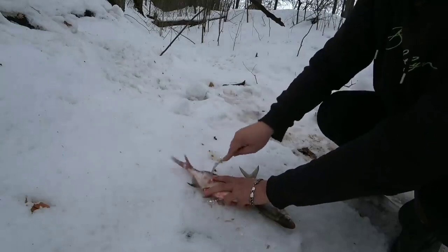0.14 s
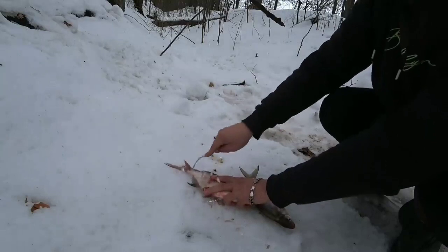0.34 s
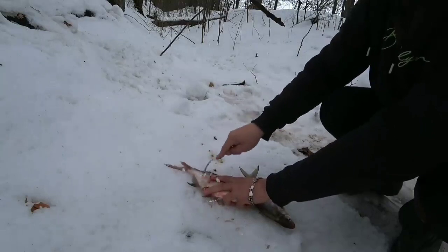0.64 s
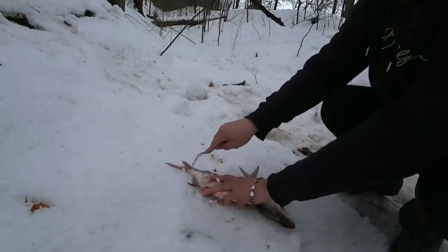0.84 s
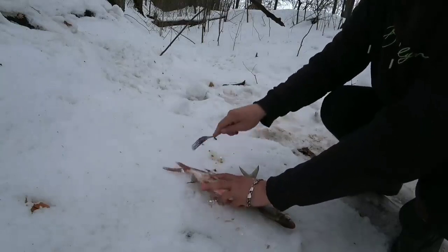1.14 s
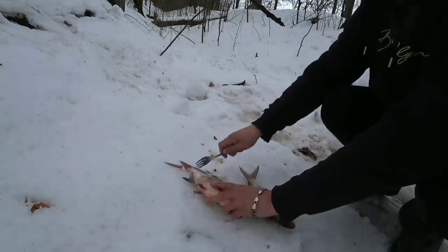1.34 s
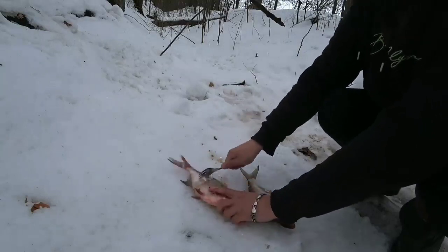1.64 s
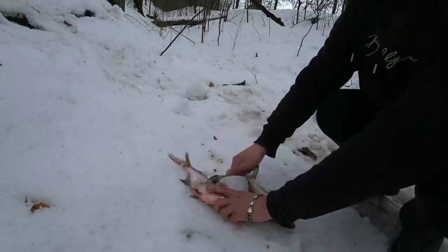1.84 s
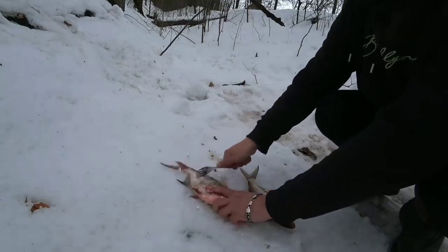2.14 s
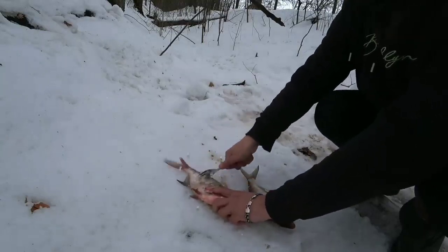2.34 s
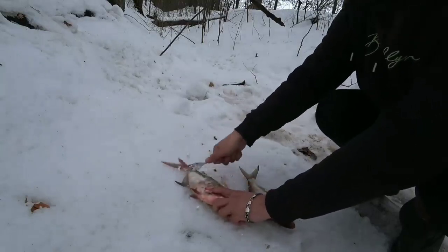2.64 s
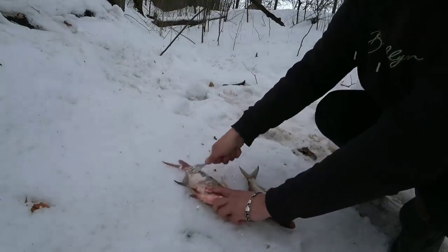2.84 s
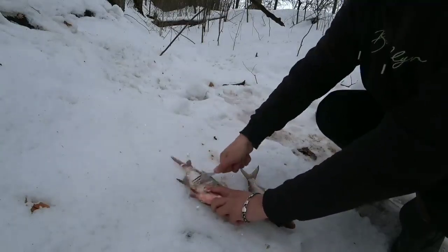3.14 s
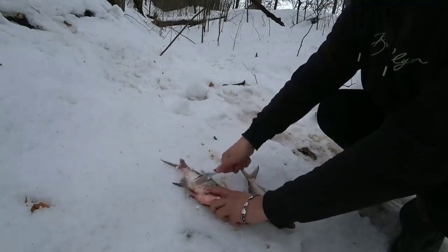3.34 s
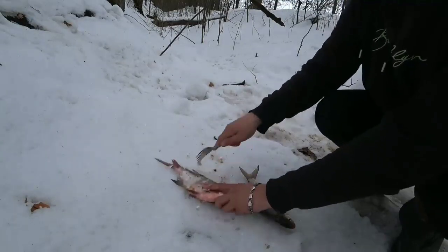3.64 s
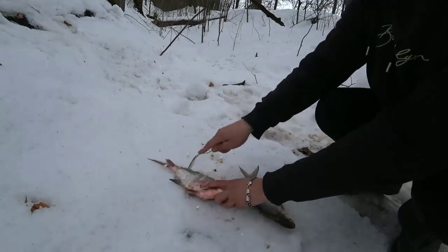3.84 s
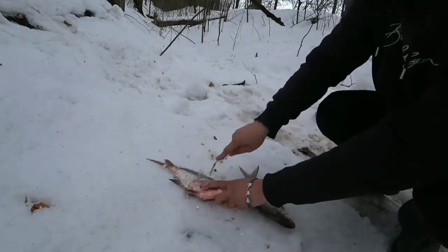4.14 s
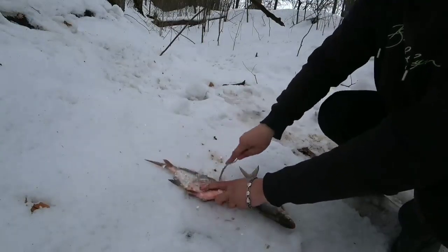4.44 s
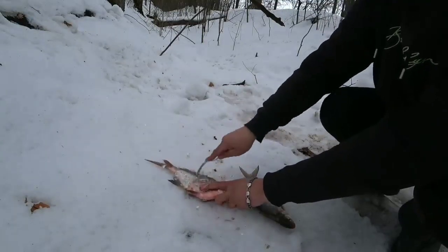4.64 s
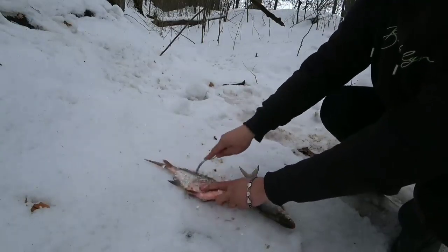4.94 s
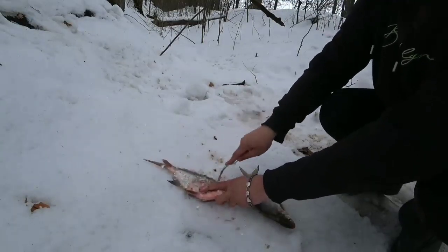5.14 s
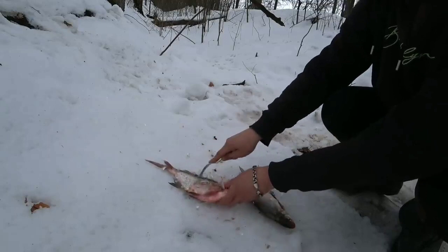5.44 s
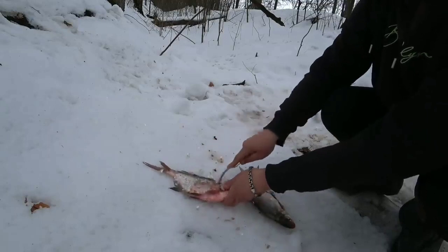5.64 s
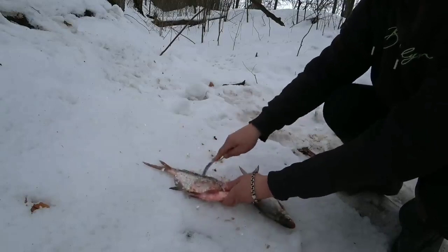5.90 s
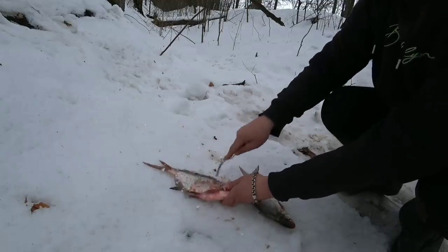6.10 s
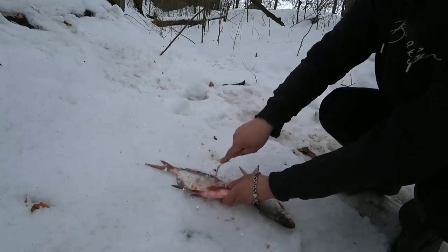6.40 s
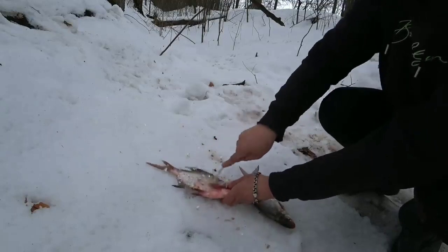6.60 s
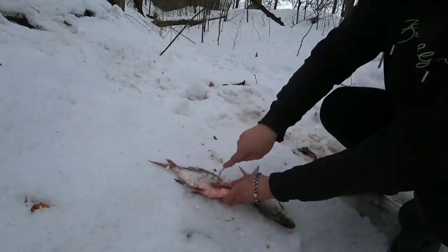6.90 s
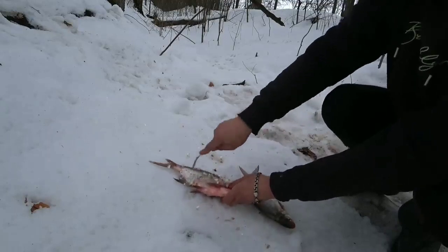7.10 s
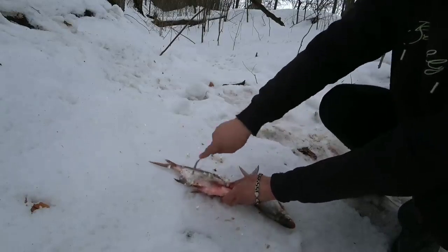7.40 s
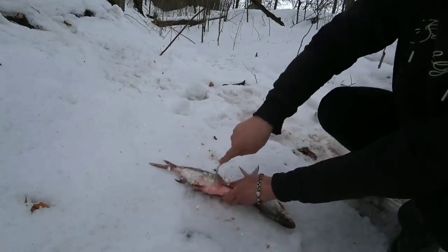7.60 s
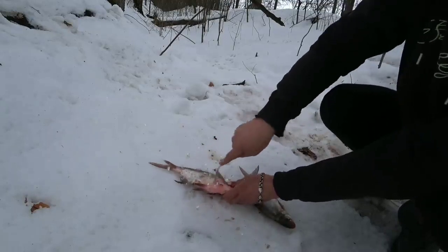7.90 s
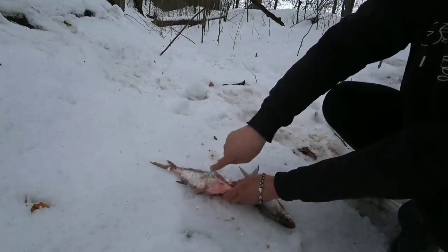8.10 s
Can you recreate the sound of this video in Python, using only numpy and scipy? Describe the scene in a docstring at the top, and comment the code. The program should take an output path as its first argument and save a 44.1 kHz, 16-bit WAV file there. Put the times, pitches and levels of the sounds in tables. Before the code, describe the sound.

Dry scratchy scraping of fork tines over fish scales, outdoors and close. Irregular hard and light passes, each a burst of tiny gritty snaps with a muffled fleshy knock under it. Individual scales crack loudly, especially near two seconds. The middle strokes are duller and more spaced, the final ones brisk and crisp. The fish sits slightly right of centre; very quiet, wide outdoor air surrounds it.

```python
"""The listener first hears a fork scraping scales off a small fish on snow, about five hard or light passes
a second. Stick-slip of the tines is a random train of tiny damped snaps, with a duller knock of the body under it.
Single scales pop off as tight clusters of snaps and set the fork's modes ringing; the body thumps on the
snow as damped modes. Underneath lies a faint, wide wash of open air: noise shaped in frequency and time."""
import sys
import numpy as np
from scipy import signal
from scipy.io import wavfile
from scipy.ndimage import uniform_filter1d

SR = 44100
rng = np.random.default_rng(int(sys.argv[2]) if len(sys.argv) > 2 else 0)


def materialize(psi):
    """Save the field psi as 16-bit PCM at rate SR to the path in sys.argv[1].

    A 1-D psi becomes a single channel; in a 2-D psi each row is a channel.
    """
    bounded = np.clip(np.atleast_2d(psi).T, -1, 1)
    quanta = np.round(bounded * 32767).astype(np.int16)
    wavfile.write(sys.argv[1], SR, quanta)


N = 364266  # length [samples]


def gain_of(db):
    """Level law: decibels to an amplitude factor."""
    return 10 ** (np.asarray(db) / 20)


def evened(x):
    """Power normalisation: scales to rms 1."""
    return x / np.sqrt(np.mean(x ** 2) + 1e-20)


def read(points, hz):
    """Spectral envelope: interpolates the points on a log-frequency axis."""
    f, value = np.transpose(points)
    return np.interp(np.log(hz + 1), np.log(f + 1), value)


def add(mix, s, sound):
    """Superposition: mixes a two-row sound in at s seconds."""
    part = mix[:, round(s * SR):][:, :sound.shape[1]]
    part += sound[:, :part.shape[1]]


def coloured(x, points):
    """Minimum-phase filtering: the Hilbert transform of the log gain gives the phase of a causal filter."""
    hz = abs(np.fft.fftfreq(2048, 1 / SR))
    log_gain = np.log(gain_of(np.maximum(read(points, hz), -100)))
    response = np.exp(np.conj(signal.hilbert(log_gain)))
    taps = np.fft.ifft(response).real[:1024]
    return signal.oaconvolve(x, taps[None], axes=1)[:, :x.shape[1]]


def snap(hz, cycles, grit, size=256):
    """Damped oscillation: a short gritty wiggle, once for the middle and once, unrelated, for the side."""
    turns = np.arange(size) / SR * hz
    detune, phase = rng.uniform(0.85, 1.076, (2, 1)), rng.random((2, 1))
    wiggle = np.sin(2 * np.pi * (turns * detune + phase))
    sound = (wiggle + grit * rng.standard_normal((2, size))) * np.exp(-turns / cycles)
    return sound / np.linalg.norm(sound, axis=1, keepdims=True)


# spectra of the scale crackle and of the knock of the flesh: (frequency [Hz], relative density [dB per Hz])
CRACKLE_SPECTRUM = [(800, -18.5), (1500, -15), (2800, -13), (4500, -11), (6500, -2), (8200, 1), (9300, -2),
                    (11000, -0.5)]
KNOCK_SPECTRUM = [(35, -42), (60, -18), (196, -4), (268, 0), (340, -3.5), (489, 0), (702, -1.5), (890, 0.5),
                  (994, -3), (1110, -3), (1590, -3.5), (2600, -12.5), (3380, -59), (5720, -120)]


def drag():
    """Stick-slip friction: scale edges crackle over a fine rasp, and the same slips knock the flesh."""
    bright_gain, dull_gain, knock_gain = pressure()
    per_s = np.clip(2600 * np.sqrt(bright_gain / gain_of(-45)), 350, 2600)  # a light touch catches few scales
    train = slips(per_s, spread_db=2.0, clump_db=1.5)

    edges = evened(grains(train, 1894, 13570, cycles=1.8, grit=0.6))
    rasp = gain_of(-9.5) * rng.standard_normal((2, N))
    crackle = coloured(edges + rasp, CRACKLE_SPECTRUM)
    dull = signal.sosfilt(signal.butter(4, 4500, fs=SR, output="sos"), crackle)
    bright = signal.sosfilt(signal.butter(4, 4500, "high", fs=SR, output="sos"), crackle)
    crackle = bright_gain * evened(bright) + dull_gain * evened(dull)

    heavy = train * (rng.random(N) < 0.45)  # under half of the slips reach the flesh
    flesh = evened(grains(heavy, 322, 3110, cycles=1.55, grit=0.11))
    flesh = flesh + gain_of(-2.0) * rng.standard_normal((2, N))
    knock = knock_gain * evened(coloured(flesh, KNOCK_SPECTRUM))
    return crackle * gain_of([[0], [-10.5]]) + knock * gain_of([[0], [-8]])  # rows: middle, side


# passes of the tines, hard and light: (deepest time [s], bite before it [ms], drag after it [ms],
# bright crackle at the deepest, before raggedness [dB], body knock above the crackle, before the dig [dB])
PASSES = [(0.114, 20, 18, -61, -1), (0.188, 56, 5.8, -33, -18), (0.253, 10, 9.1, -58, -11),
          (0.493, 63.5, 31, -39, -15.5), (0.745, 41, 29, -40.5, -14.9), (1.004, 26.4, 40, -33.5, -18),
          (1.139, 28, 135, -63.5, -6), (1.391, 95, 370, -58.5, -1.5), (1.605, 9.8, 57, -40.5, -16),
          (1.709, 100, 123, -54.5, -13), (1.88, 33.5, 17.5, -38.5, -11), (1.997, 61, 7, -48, -6.1),
          (2.09, 14.5, 37, -36, -20.5), (2.199, 87, 31, -55.5, -5), (2.318, 15, 115, -42.5, -14.5),
          (2.561, 32, 102, -43, -9.5), (2.786, 28, 15, -39, -13.5), (2.901, 72, 12, -48.5, -18),
          (2.994, 28, 25, -38.5, -9.5), (3.069, 13, 88, -54.5, -12), (3.215, 65, 103, -46.5, -11.5),
          (3.414, 3.4, 33, -40.5, -10), (3.542, 167, 440, -60, -2), (4.006, 17, 110, -42, -14),
          (4.396, 79, 38, -40, -9.5), (4.728, 64, 58, -42, -9), (5.057, 47, 85, -45, -7),
          (5.307, 59, 294, -63, -16), (5.708, 73, 41, -46, -7.5), (6.05, 64, 15, -48.5, -6.5),
          (6.323, 22, 48, -38.5, -12.5), (6.646, 59, 33, -37.5, -8), (6.747, 329, 21, -57, -13),
          (6.955, 55, 13.6, -34.5, -5.5), (7.061, 27, 10, -51, -13), (7.257, 52, 30, -37.5, -4),
          (7.546, 33.7, 39, -33.5, -9.5), (7.773, 13, 12, -59, 7), (7.863, 60.5, 45.5, -35.5, -15),
          (8.143, 14, 44, -35.5, -17)]
# how flat the fork lies on the skin: (time [s], flatness [0 upright - 1 flat])
FLATNESS = [(0, 0.11), (.8, 0.075), (1.0, 0.62), (1.7, 0.46), (2.0, 0.67), (2.8, 0.61), (3.5, .9),
            (4.0, 0.23), (5.7, 0.22), (6.4, 0.085), (6.9, .05), (7.3, .3), (8.26, 0.31)]


def pressure():
    """Contact-force envelopes for bright crackle, dull part and knock: tines bite, drag raggedly and lift."""
    edge_drop_db, roundness = 11, 0.89  # loss where tines land and lift; exponent 1 = pointed, 2 = round
    lift_db_per_s = 620  # extra fade once the tines are off the skin
    knock_follows, dull_follows = 0.58, 0.83  # dB each layer moves for one dB of crackle within a pass
    dull_base_db, dull_per_knock, dull_flat_db = -6, 0.2, 6  # dull part grows with knock and with flatness
    dig_db, dig_place, dig_width = 5.5, 0.47, 0.56  # knock lost away from thick flesh; shares of the pass
    t, out = np.arange(0, N, 32) / SR, 0
    flat = np.interp(t, *np.transpose(FLATNESS))
    for deepest, bite_ms, drag_ms, crackle_db, knock_db in PASSES:
        away = abs(t - deepest)
        contact = np.maximum(np.where(t < deepest, bite_ms, drag_ms), 2) / 1000
        drop_db = edge_drop_db * np.minimum(away / contact, 1) ** roundness
        drop_db = drop_db + lift_db_per_s * np.maximum(away - contact, 0)
        dull_db = dull_base_db + dull_per_knock * knock_db + dull_flat_db * flat
        place = (t - deepest + bite_ms / 1000) / ((bite_ms + drag_ms) / 1000)
        knock_db = knock_db - dig_db * (1 - np.exp(-((place - dig_place) / dig_width) ** 2))
        layers_db = np.array([-drop_db, dull_db - dull_follows * drop_db, knock_db - knock_follows * drop_db])
        out = out + gain_of(crackle_db + layers_db)
    ragged = uniform_filter1d(uniform_filter1d(rng.standard_normal(N), 500), 400)
    return np.repeat(out, 32, axis=1)[:, :N] * gain_of(1.8 * evened(ragged))


def slips(per_s, spread_db, clump_db):
    """Random point process: instants of tine release, of clumped sizes; expected rms is 1 at any rate."""
    clumps = evened(uniform_filter1d(rng.standard_normal(N), 180))
    size_db = spread_db * np.minimum(rng.exponential(1, N), 4) + clump_db * clumps
    lets_go = rng.random(N) < per_s / SR
    return evened(gain_of(size_db)) * lets_go * np.sqrt(SR / per_s)


def grains(train, low_hz, high_hz, cycles, grit, count=24):
    """Impulse response convolution: each slip sounds one of a set of snaps of different pitch."""
    which, out = rng.integers(0, count, N), np.zeros((2, N))
    for k, hz in enumerate(np.linspace(low_hz, high_hz, count)):
        chosen = train * (which == k)
        out += signal.oaconvolve(chosen[None], snap(hz, cycles, grit), axes=1)[:, :N]
    return out


# scales popping off: (main snap time [s], crack peak before placing in the stereo field [dB],
# nominal centre frequency [Hz], dull tock above the crack peak [dB])
SCALE_POPS = [(0.1378, -25, 7240, -13), (0.1433, -17, 8800, -17), (0.1545, -14, 8800, -35),
              (0.18, -11, 6840, -35), (0.1884, -9.5, 6200, -25), (0.4358, -25, 7500, -14),
              (0.4407, -15.5, 8100, -18), (0.478, -15, 5900, -31), (0.4946, -13.5, 6900, -45),
              (0.592, -25, 6200, -16), (0.767, -22.5, 5900, -23), (0.772, -11.5, 6120, -25),
              (0.9502, -31.5, 5740, -9), (0.9724, -22, 3460, -8), (1.004, -14, 8500, -37),
              (1.033, -10, 9600, -12.5), (1.0418, -7.5, 7000, -12.5), (1.0816, -10.5, 6500, -41),
              (1.1295, -31, 7650, -30), (1.1504, -30, 7000, -22), (1.3683, -19.5, 8050, -8.5),
              (1.4006, -26, 6600, -5.5), (1.431, -38, 6000, -5), (1.4934, -27, 7600, -8.5),
              (1.6103, -21, 7060, -29), (1.6342, -19, 5970, -4.5), (1.676, -19, 8900, -34),
              (1.7429, -27, 5830, -4), (1.8257, -22, 5600, -8.5), (1.8518, -18.5, 6200, -42),
              (1.876, -3, 6300, -24), (2.09, -18, 4600, -33), (2.0758, -24, 6200, -16),
              (2.0964, -17, 5440, -10.5), (2.13, -3, 5970, -35), (2.3223, -20.5, 6600, -11),
              (2.3463, -21, 6950, -10.5), (2.557, -15, 7240, -24), (2.776, -12, 8300, -38),
              (2.7934, -13.5, 5550, -29), (2.812, -27, 2180, -5), (2.897, -28, 7700, -31),
              (2.9897, -20, 5800, -30), (3.0105, -19, 6400, -20), (3.04, -34.5, 3000, -2.5),
              (3.0583, -31.5, 6440, -21), (3.131, -11, 7800, -43), (3.1534, -27, 4450, -25),
              (3.2106, -20, 5530, -25), (3.2206, -21.5, 6480, -21), (3.4116, -15.5, 6840, -26),
              (3.4557, -17, 6650, -14.5), (3.5687, -25, 7300, -8.5), (3.643, -35, 6180, -18),
              (3.659, -36, 6000, -6), (3.984, -26, 7000, -17), (4.0715, -10, 7300, -13),
              (4.1457, -40, 8710, -28), (4.1771, -27.5, 5270, -1.5), (4.187, -35, 4660, 4),
              (4.3383, -23, 7440, -17), (4.3711, -24, 8410, -15), (4.655, -27, 8900, -33),
              (4.722, -32.5, 7040, -19), (4.994, -25.5, 10000, -32), (5.078, -29.5, 7000, -16),
              (5.3675, -40, 6000, -7), (5.4278, -35.5, 4170, -26), (5.4873, -36.5, 6700, -8.5),
              (5.5753, -34.5, 4200, -6.5), (5.7143, -27.5, 3840, -7.5), (5.893, -35.5, 5000, 2),
              (6.0477, -25.5, 8200, -29), (6.293, -25, 6670, -8), (6.3125, -26, 7560, -13),
              (6.3541, -9, 7080, -15.5), (6.3785, -22, 7700, -10), (6.5378, -28.5, 5400, -2.5),
              (6.5753, -39, 4870, 1), (6.604, -11, 8900, -30), (6.6558, -8, 6550, -18.5),
              (6.747, -36.5, 6050, -5), (6.898, -21.5, 7000, -9), (7.1335, -42, 6000, -4),
              (7.2128, -10, 7800, -22), (7.2629, -16, 7850, -9), (7.2845, -19.5, 6200, -14),
              (7.3202, -28.5, 4000, -10), (7.389, -34.5, 9800, -7), (7.5319, -10, 6040, -10.5),
              (7.537, -14.5, 6950, -7), (7.646, -40, 7670, -15), (7.771, -27.5, 7430, -6.5),
              (7.8618, -18, 7300, -6.5), (7.8704, -8, 6460, -21), (7.886, -14.5, 7100, -33),
              (7.8934, -18.5, 5840, -31), (7.9077, -15, 8900, -46), (8.056, -39.5, 3600, -16),
              (8.095, -34.5, 7490, -4.5), (8.131, -19, 5950, -40), (8.1453, -14, 7000, -40),
              (8.2212, -14.5, 7900, -45)]


def pops():
    """Fracture burst: a tight cluster of thin snaps round a main one, a dull tock and a faint fork ring."""
    out, t = np.zeros((2, N)), np.arange(3000) / SR
    ring = fork_ring(t)
    main_ms = 0.88  # from the start of the cluster to its main snap
    age = 1000 * t / main_ms
    for s, peak_db, hz, tock_db in SCALE_POPS:
        draw = rng.random((len(t), 2))
        swell = 1.4 * age * np.exp(-0.7 * age)
        train = (draw[:, 0] < 5000 / SR) * (2 * draw[:, 1] - 1) * swell
        train[round(main_ms * SR / 1000)] = 1  # the main snap
        crack = signal.fftconvolve(train[None], snap(hz, cycles=1.07, grit=0.67), axes=1)[:, :len(t)]
        thin = signal.butter(2, 0.43 * hz, "high", fs=SR, output="sos")
        crack = signal.sosfilt(thin, crack)
        tock = signal.fftconvolve(train[None], snap(1400, cycles=0.6, grit=0.2), axes=1)[:, :len(t)]
        pop = crack / abs(crack[0]).max() + gain_of(tock_db) * tock / abs(tock[0]).max()
        pop += 0.03 * ring
        add(out, s - main_ms / 1000, gain_of(peak_db + np.array([[-1.5], [-12]])) * pop)
    return out


# modes of the fork: (frequency [Hz], relative level [dB], time to fall 60 dB [s])
FORK_MODES = [(3920, -9, 0.05), (6100, -44, 0.014), (7560, -1.5, 0.022), (7440, -3.5, 0.032),
              (8900, -20, 0.028)]


def fork_ring(t):
    """Modal superposition: the fork's exponentially decaying sines, weaker in the side."""
    ring = sum(gain_of(db - 60 * t / t60) * np.sin(2 * np.pi * hz * t) for hz, db, t60 in FORK_MODES)
    return ring * [[1], [0.4]]


# stronger fork ring with the pops near 3.13 s: (time [s], gain on the fork's modes [dB])
STRONGER_RINGS = [(3.1298, -25), (3.1358, -27), (3.153, -37)]


def stronger_rings():
    """Modal superposition: a stronger fork ring with the pops near 3.13 s, in the same modes."""
    out, ring = np.zeros((2, N)), fork_ring(np.arange(3000) / SR)
    for s, db in STRONGER_RINGS:
        add(out, s, gain_of(db) * ring)
    return out


# the fish's body thumps on the snow: (time [s], peak level before placing in the stereo field [dB],
# lowest frequency of the first mode [Hz], time for the modes to fall 60 dB [s])
BODY_THUDS = [(1.634, -45, 245, 0.028), (2.131, -29.5, 224, 0.017), (4.075, -31.5, 506, 0.013),
              (4.083, -39, 135, 0.018), (5.745, -43, 420, 0.011)]


def thuds():
    """Heavily damped modes: soft flesh gives a rounded start and a few dying cycles."""
    out, t = np.zeros((2, N)), np.arange(4000) / SR
    for s, peak_db, hz, t60 in BODY_THUDS:
        mode_hz = hz * rng.uniform(1.0, 1.1, (3, 1)) * [[1], [1.6], [1.2]]  # two modes, and one for the side
        first, second, side = np.sin(2 * np.pi * mode_hz * t) * gain_of(-60 * t / max(t60, 0.003))
        rounded_start = 1 - np.exp(-t / 0.0022)
        thud = np.array([first + 0.35 * second, 0.082 * side]) * rounded_start
        add(out, s, gain_of(peak_db) * thud / abs(thud).max())
    return out


# spectra of the open air, alike in both channels and opposed: (frequency [Hz], relative density [dB per Hz])
AIR_ALIKE = [(12, -39), (20, 3), (59, -4.5), (187, -10), (286, -11), (372, -10.5), (537, -14.5), (699, -15),
             (1500, -18.5), (2820, -23), (10800, -29), (14000, -52), (22000, -120)]
AIR_OPPOSED = [(12, -50), (20, -29), (203, -11), (326, -11), (537, -9), (581, -7), (646, -10.5),
               (840, -8.5), (1800, -15), (3770, -24.5), (10800, -33), (14000, -62), (22000, -120)]


def air():
    """Filtered random noise: a distant wash with drifting patches, very wide, its side above its middle."""
    mid_db, side_db = -61, -58  # rms levels before placing in the stereo field
    frames, hz = N // 256 + 5, np.fft.rfftfreq(1024, 1 / SR)
    a, b, c, d, patches = rng.standard_normal((frames, 513, 5)).T
    patches = uniform_filter1d(patches, 12, 0)  # smooth over frequency
    patches = evened(uniform_filter1d(patches, 14, 1))  # and over time
    colour_db = np.array([read(AIR_ALIKE, hz), read(AIR_OPPOSED, hz)])[:, :, None]
    drift_db = 1.5 * patches
    spectra = np.array([a + 1j * b, c + 1j * d]) * gain_of(colour_db + drift_db)
    mid, side = signal.istft(spectra, nperseg=1024, noverlap=768)[1][:, :N]
    return np.array([gain_of(mid_db) * evened(mid), gain_of(side_db) * evened(side)])


def scene():
    """Sum-and-difference stereo: middle and side become left and right, the fish slightly to the right."""
    mid, side = drag() + pops() + stronger_rings() + thuds()
    air_mid, air_side = air()
    fish = np.array([mid + side, mid - side]) * gain_of([[-1.1], [1.05]])
    wash = np.array([air_mid + air_side, air_mid - air_side]) * gain_of([[-0.4], [0.4]])
    return fish + wash


def band_limit(x):
    """A steep low-pass at the top of the band."""
    return signal.sosfilt(signal.butter(12, 12320, fs=SR, output="sos"), x)


# steep treble edge, almost nothing is heard above 11 kHz: (frequency [Hz], gain [dB])
TREBLE_EDGE = [(0, -1), (10900, 0.5), (11080, -8.5), (11500, -24), (13000, -51), (22050, -90)]


def record(dry):
    """Linear-phase low-pass filtering: a steep treble edge, almost nothing is heard above 11 kHz."""
    hz = np.linspace(0, SR / 2, 1025)
    f, db = np.transpose(TREBLE_EDGE)
    taps = signal.firwin2(1501, hz, gain_of(np.interp(hz, f, db)), fs=SR, window=("kaiser", 8))
    mix = signal.oaconvolve(dry, taps[None], "same", axes=1)
    return band_limit(mix)


dry = scene()
out = record(dry)
materialize(out)
```